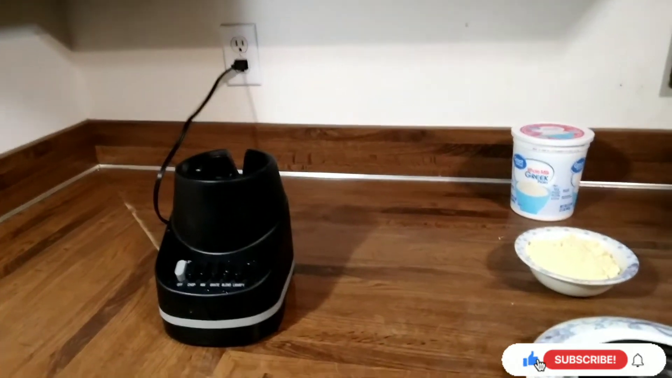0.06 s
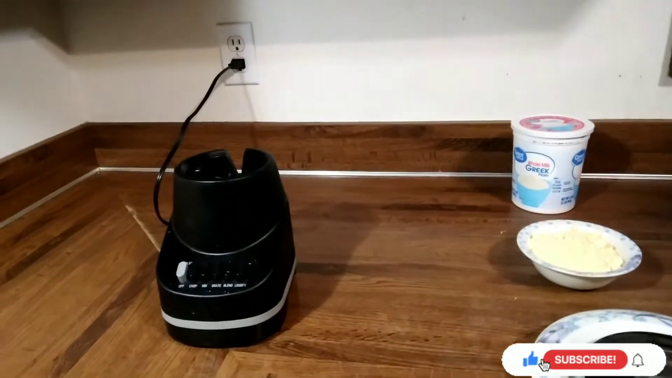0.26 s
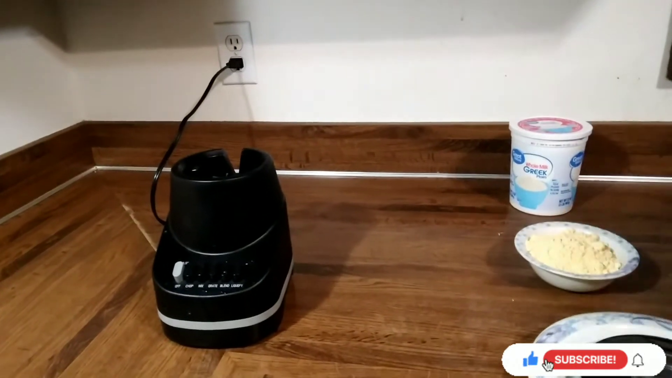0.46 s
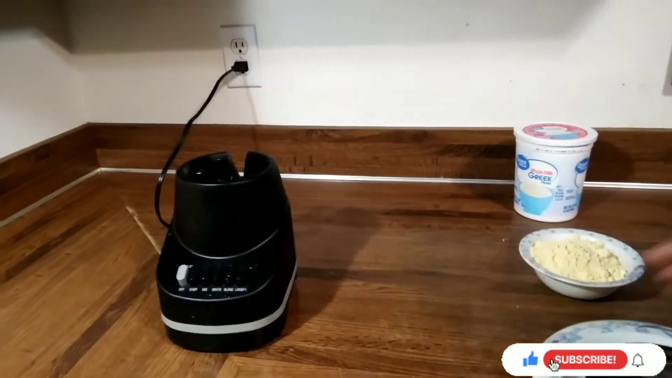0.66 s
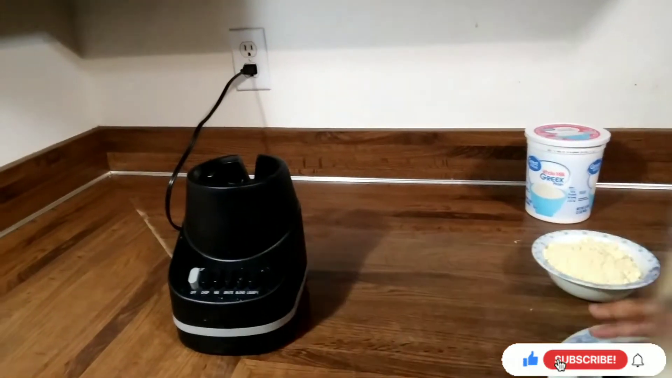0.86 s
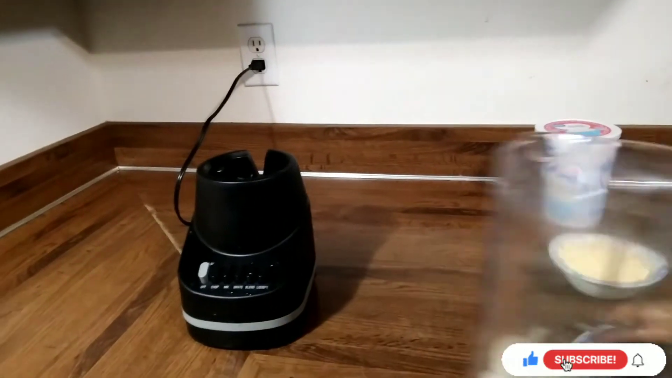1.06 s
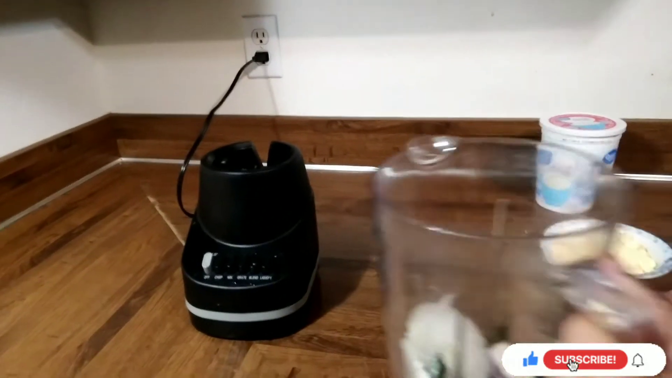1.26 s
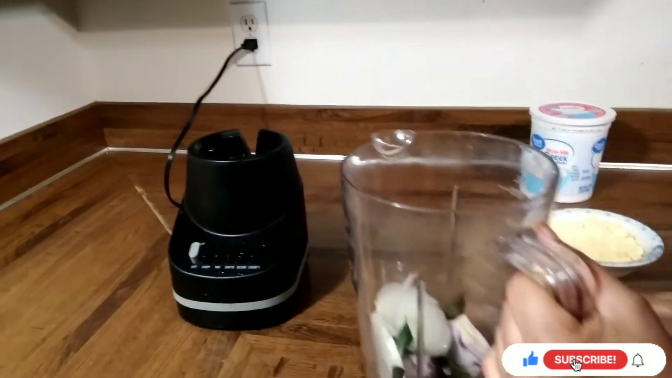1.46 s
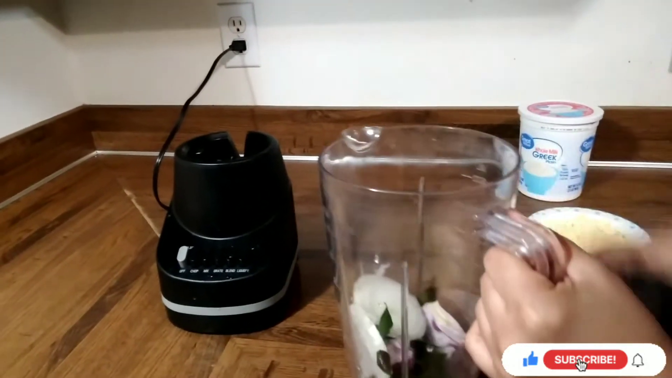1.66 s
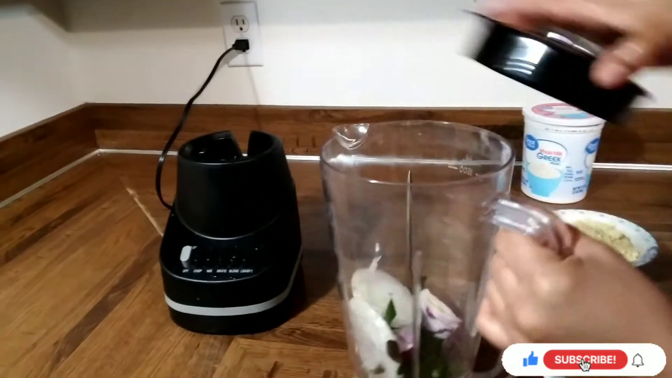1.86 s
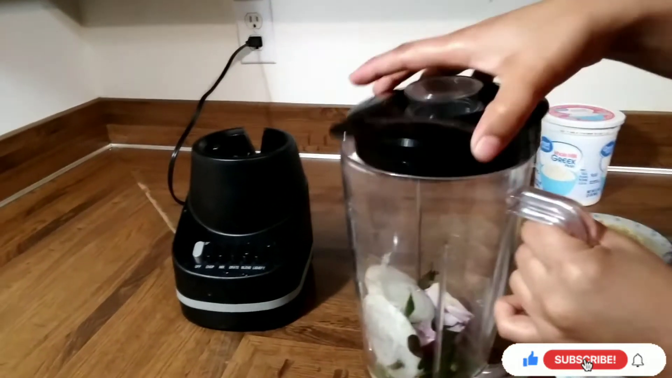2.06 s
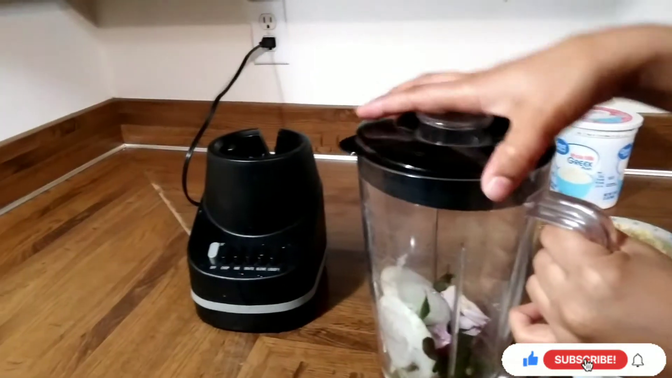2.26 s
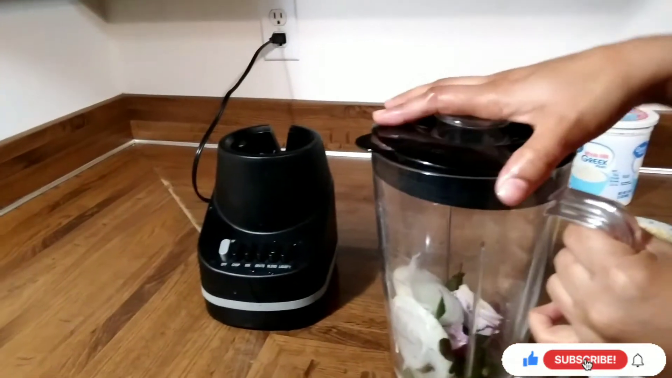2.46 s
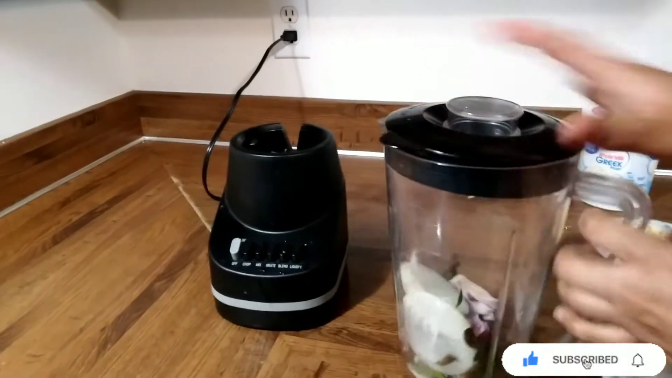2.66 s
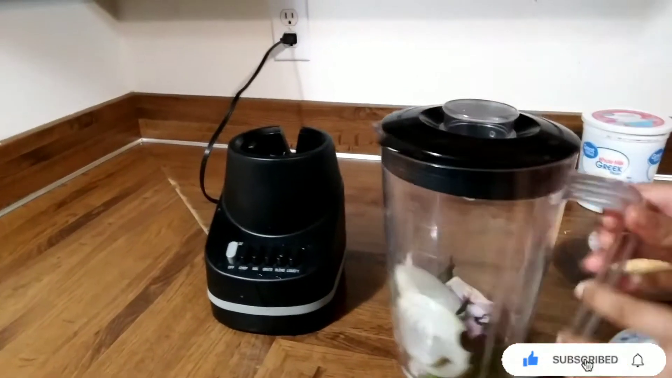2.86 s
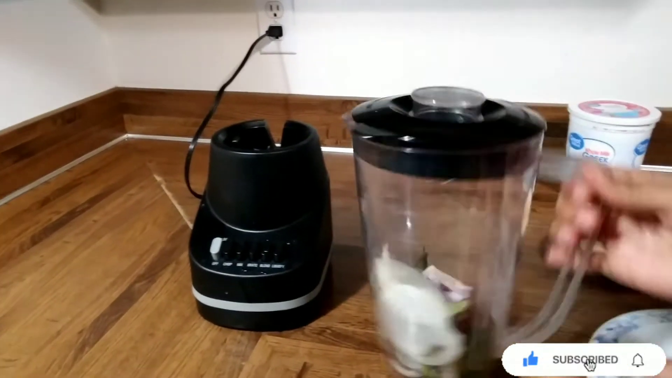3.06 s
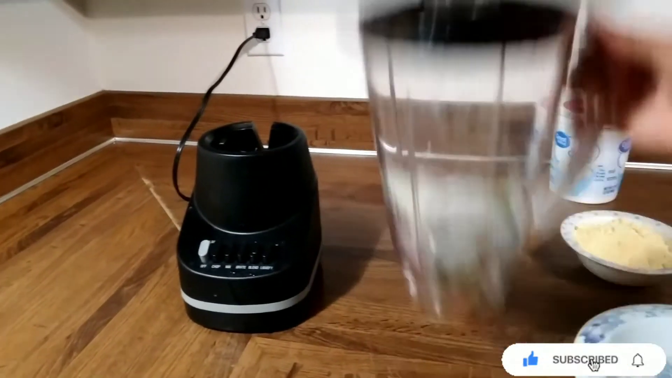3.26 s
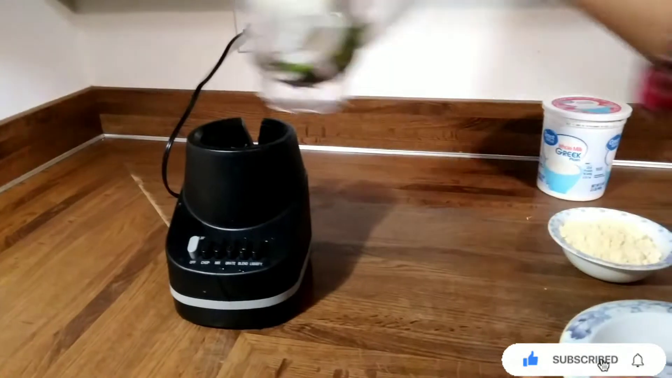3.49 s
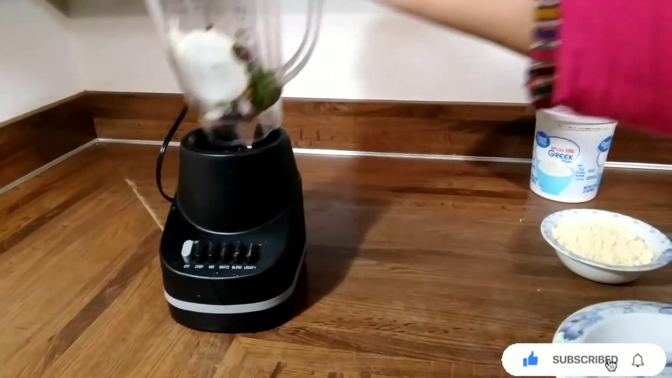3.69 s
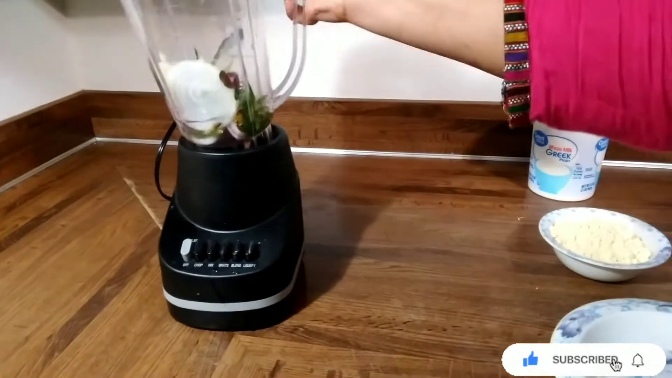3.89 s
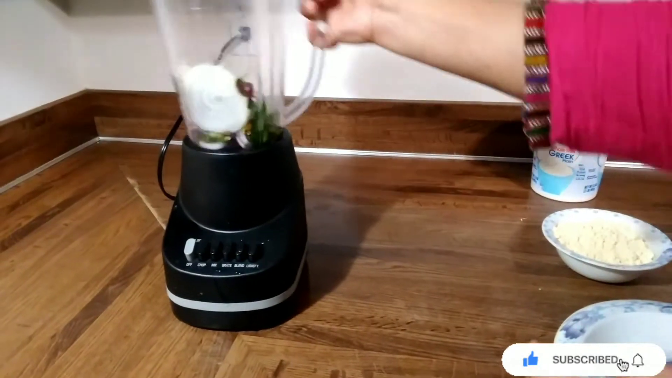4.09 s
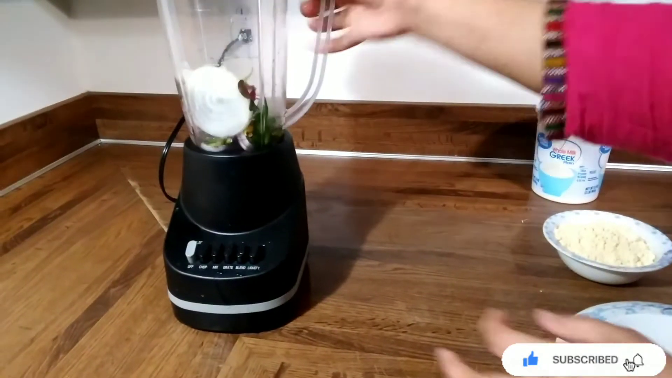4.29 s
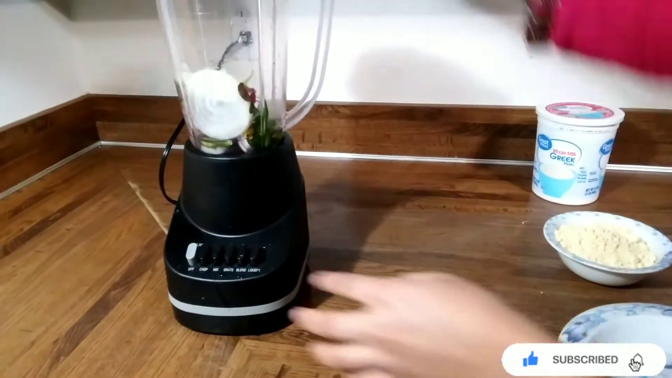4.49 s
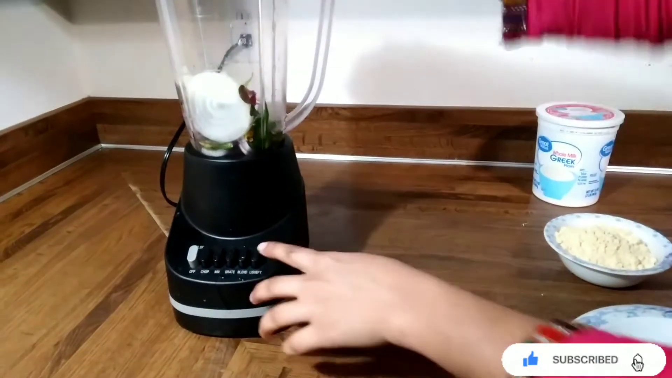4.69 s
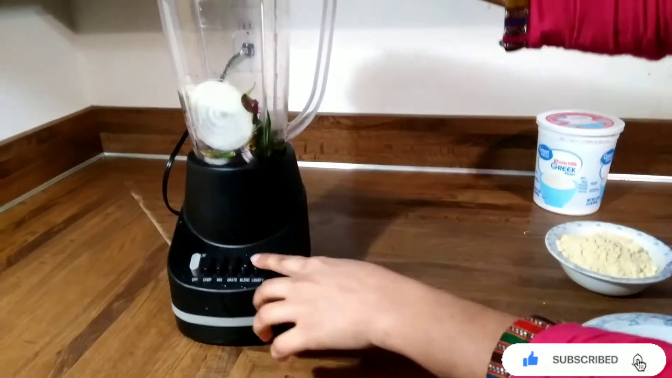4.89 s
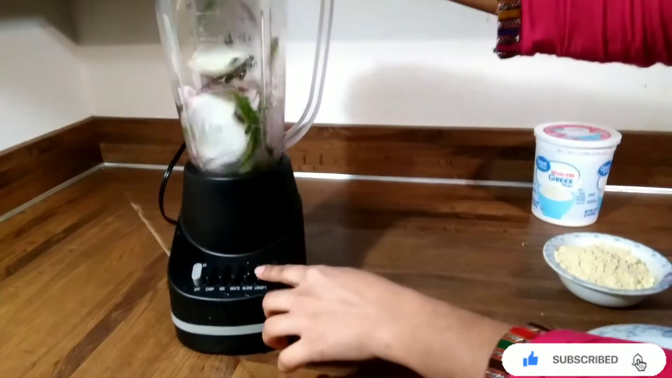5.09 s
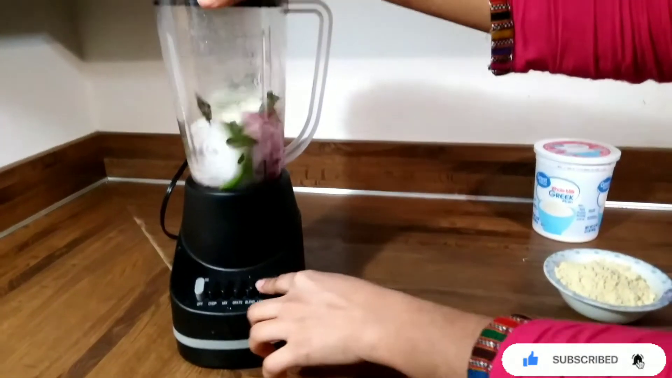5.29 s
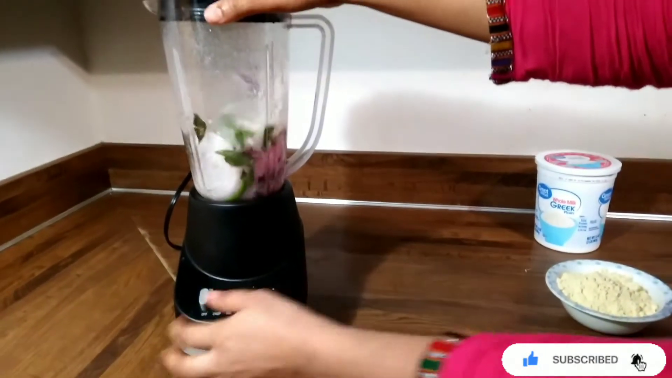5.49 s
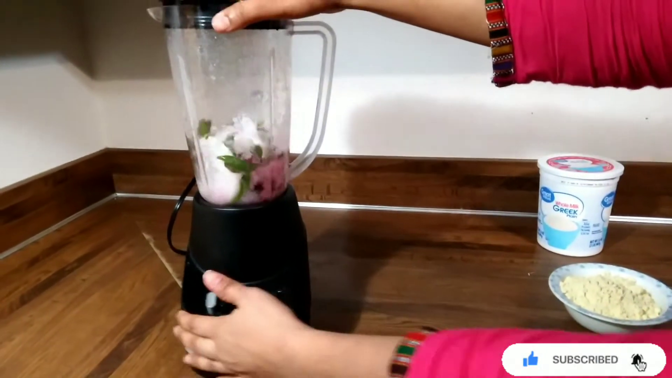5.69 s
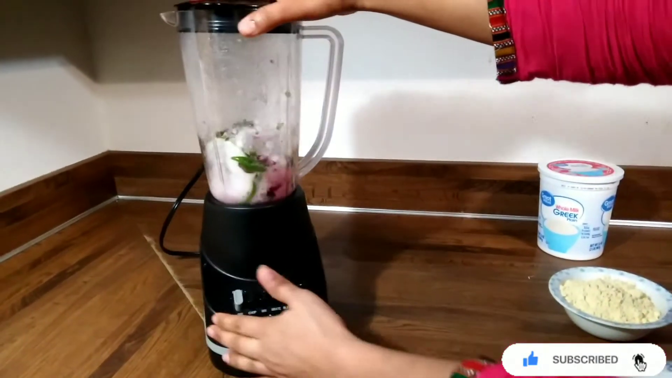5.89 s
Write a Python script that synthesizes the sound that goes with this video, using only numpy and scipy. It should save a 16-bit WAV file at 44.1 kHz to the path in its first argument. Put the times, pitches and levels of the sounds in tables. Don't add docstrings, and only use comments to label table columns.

```python
import sys
import numpy as np
from scipy import signal
from scipy.fft import rfft, irfft, next_fast_len
from scipy.io import wavfile
from scipy.ndimage import uniform_filter1d

SR = 44100
rng = np.random.default_rng(int(sys.argv[2]) if len(sys.argv) > 2 else 0)


def store_pcm(level_fs):
    pcm = np.round(np.clip(level_fs, -1, 1) * 32767).astype(np.int16)
    wavfile.write(sys.argv[1], SR, np.atleast_2d(pcm).T)


def elevation(decibels):
    levels = np.asarray(decibels, float)
    return 10 ** (levels / 20)


N = 261947
T = np.arange(N) / SR


def rms_one(x):
    return x / np.sqrt(np.mean(x ** 2) + 1e-20)


def in_time(rows):
    s, value = np.transpose(rows)
    return np.interp(T, s, value)


def at_hz(points, hz):
    point_hz, value = np.transpose(points)
    return np.interp(np.log(hz + 1), np.log(point_hz), value)


def drift(rate_hz, size=N):
    knot_hz = 400
    knots = rng.standard_normal(int(size / SR * knot_hz) + knot_hz + 2)
    r = np.exp(-2 * np.pi * rate_hz / knot_hz)
    slow = signal.lfilter([1], [1, -2 * r, r * r], knots)
    slow = rms_one(slow[knot_hz:])
    return np.interp(np.arange(size) / SR * knot_hz, np.arange(len(slow)), slow)


def ring(clicks, hz, t60_s):
    r = elevation(-60 / (t60_s * SR))
    w = 2 * np.pi * hz / SR
    return signal.lfilter([0, np.sin(w)], [1, -2 * r * np.cos(w), r * r], clicks + 1e-18)


def treble(x, hz):
    return x - signal.sosfiltfilt(signal.butter(2, hz, fs=SR, output="sos"), x)


def swells(rows, t):
    s, db, rise_s, fall_s = np.transpose(rows)[..., None]
    away = np.maximum((s - t) / rise_s, (t - s) / fall_s)
    return elevation(np.max(db - 20 * away, axis=0))


# f/Hz, likeness/1
LIKENESS = [(60, 0.85), (130, 1), (270, 1), (400, .95), (570, 0.78), (1220, -0.38), (2580, -0.22),
            (5480, 0.18), (11600, -1.2)]


def noise(spectrum, patchy_db=0., rate_hz=15, size=N):
    padded = next_fast_len(size)
    hz = np.arange(padded // 2 + 1) * SR / padded
    alike = np.clip(at_hz(LIKENESS, hz), -1, 1)
    mid, side = rfft(rng.standard_normal((2, size)), padded) * elevation(at_hz(spectrum, hz))
    pair = np.sqrt(1 + alike) * mid + np.sqrt(1 - alike) * side * [[1], [-1]]
    if not patchy_db:
        return rms_one(irfft(pair, padded)[:, :size])
    octave = np.log2(hz + 1)
    out = np.zeros((2, size))
    for k in range(4, 15):
        if 2 ** (k - 1) < spectrum[-1][0]:
            share = np.clip(1 - abs(octave - k), 0, 1)
            flicker = elevation(patchy_db * drift(rate_hz, size))
            out += irfft(pair * share, padded)[:, :size] * flicker
    return rms_one(out)


def kitchen(x):
    t60_s, level_db = 0.27, -6
    t = T[:SR // 2]
    tail = rng.standard_normal((2, len(t))) * elevation(-60 * t / t60_s) * (t > .004)
    tail = signal.sosfilt(signal.butter(2, [520, 4800], "band", fs=SR, output="sos"), tail)
    tail = tail / np.sqrt(np.sum(tail ** 2) / 2)
    return x + elevation(level_db) * signal.fftconvolve(x, tail, axes=1)[:, :N]


# opens t/s, shuts t/s, airy top re hiss level/dB, lower edge re hiss level/dB
GATE = [(0.0, 0.073, -19, -3), (0.208, 0.234, -5, -6), (0.611, 0.638, -8, -2), (0.838, 1.215, -14, -6),
        (1.343, 1.947, -10, -1), (1.947, 2.288, -13, -2), (2.43, 3.155, -11, -1), (3.57, 3.6, 3, -8),
        (3.645, 3.715, -25, -5), (3.757, 3.965, -19, -6), (3.995, 4.197, -11, -4), (4.228, 4.305, -20, -2),
        (4.338, 4.35, -20, -2), (4.43, 4.555, -6, -3), (4.588, 4.797, -9, -7), (4.9, 5.1, -14, -5)]
# peak t/s, level/dB, rise per 20 dB t/s, fall per 20 dB t/s
RUSTLES = [(0.0, -54.5, .01, .1), (0.218, -73.5, .011, .025), (0.626, -75, .025, .02),
           (0.875, -63, .05, .3), (1.19, -62, .2, .2), (2.0, -56, .1, .7), (4.344, -78, .02, .02),
           (0.948, -46, .03, .1), (1.05, -42, .16, .11), (1.37, -53, .2, .5), (1.58, -46, .12, .12),
           (1.7, -52.5, 1.5, 2.5), (1.862, -46, .12, .1), (2.116, -40, .008, .045), (2.24, -59, .1, .05),
           (2.58, -48, .12, .45), (2.815, -46, .05, .07), (2.93, -44, .13, .09), (3.045, -40, .07, .075),
           (3.575, -82, .01, .05), (3.646, -63, .01, .11), (3.765, -46, .012, .2), (3.83, -46, .2, .04),
           (3.95, -66, .02, .03), (4.012, -55, .008, .08), (4.033, -57, .045, .06), (4.076, -54, .007, .12),
           (4.272, -73, .04, .04), (4.49, -68, .12, .3), (4.62, -50, .03, .04), (4.664, -50, .012, .08),
           (4.905, -67, .01, .12)]
RUSTLE_TOP_DB = -40


def suppressor():
    level, top, edge, gate = np.zeros((4, N))
    for opens_s, shuts_s, airy_db, edge_db in GATE:
        inside = (T >= opens_s) & (T < shuts_s)
        passed = [row for row in RUSTLES if opens_s - .03 < row[0] < shuts_s]
        level[inside] = np.minimum(swells(passed, T[inside]), elevation(RUSTLE_TOP_DB))
        top[inside] = level[inside] * elevation(airy_db + 11)
        edge[inside] = level[inside] * elevation(edge_db)
        gate[inside] = 1
    return uniform_filter1d([level, top, edge, gate], size=250)


# f/Hz, level/dB per Hz
HISS = [(410, -47), (700, -13), (1290, -77), (1790, -37), (2220, 2.5), (2560, -3.5), (2750, 2.5),
        (4380, -0.5), (6270, -20.5), (10500, -11.5), (12100, -34), (15700, -67.5), (22000, -120)]
# f/Hz, width/Hz, level/dB
HISS_PEAKS = [(2300, 120, -9), (2650, 150, -9), (3150, 300, -7), (1600, 80, -28)]


def hiss_and_rustle(level, top_level, edge_level):
    white = rng.standard_normal((2, N))
    hiss = noise(HISS, patchy_db=2.0, rate_hz=25)
    for hz, width_hz, db in HISS_PEAKS:
        hiss = hiss + elevation(db + 4 * drift(6)) * rms_one(ring(white, hz, 2.2 / width_hz))
    top = treble(hiss, 5500)
    edge = hiss - treble(hiss, 2750)
    middle = hiss - top - edge
    out = (elevation(1.5) * level + elevation(-83.5)) * middle
    out += (elevation(1.5) * edge_level + elevation(-84)) * edge
    return out + elevation(6) * (top_level + elevation(-79)) * top


# t/s, deep level/dB, sliding level/dB, rise or fall per 20 dB t/s
SHOVES = [(0.0, -58, -62, .15), (0.56, -46, -66, .25), (1.0, -58, -48, .14), (1.12, -45, -60, .2),
          (1.38, -42, -50, .1), (1.8, -70, -57, .3), (2.2, -56, -58, .4), (2.6, -60, -54, .8),
          (2.96, -50, -45, .2), (3.2, -62, -60, .3), (3.88, -45, -42, .12), (3.97, -60, -58, .1),
          (4.22, -41, -44, .2), (4.38, -50, -60, .2), (4.66, -45, -58, .25), (4.85, -49, -52, .14)]
# f/Hz, level/dB per Hz
SLIDING = [(41, -16), (70, 0), (107, -8.5), (183, -11.5), (228, -6), (310, -15.5), (945, -23), (1500, -39),
           (1950, -55), (3300, -120)]
STILL_DEEP_DB, STILL_SLIDING_DB, SLIDING_TOP_DB = -63, -68, -50


def shoves():
    deep_level = elevation(STILL_DEEP_DB) + swells([(s, db, span_s, span_s) for s, db, _, span_s in SHOVES], T)
    sliding_level = elevation(STILL_SLIDING_DB) + swells([(s, db, span_s, span_s) for s, _, db, span_s in SHOVES], T)
    deep_spectrum = [(12, -28.5), (25, 13), (60, 4), (110, -16.5), (300, -85.5)]      # Hz, dB per Hz
    deep = noise(deep_spectrum, patchy_db=2.0, rate_hz=6)
    sliding = noise(SLIDING, patchy_db=4.5, rate_hz=19)
    return deep_level * deep + np.minimum(sliding_level, elevation(SLIDING_TOP_DB)) * sliding


# f/Hz, level/dB, t60 factor/1
BODY = [(76.5, 4, 1.2), (110.3, 2, 1.44), (150, -11.5, 1.6), (210, 2, 1.3), (288, -2, 0.65),
        (339.9, 3, 1.03), (422.8, -0.5, 0.94), (480, -1, 0.85), (600, -3.5, 0.7), (754.6, -4, 0.55),
        (888, -7, .4), (1140, -14, .5)]
# f/Hz, level/dB per Hz
CRACK = [(290, -28), (500, -8), (716, -18.5), (1110, -8.5), (1920, -13.5), (2540, -5.5), (6540, -27),
         (10200, -35), (12100, -41), (15700, -50), (22000, -120)]
# t/s, peak level/dB, favoured f/Hz, crack re peak level/dB
JAR_KNOCKS = [(0.004, -52, 320, -25), (0.425, -60, 500, -25), (0.613, -50, 250, -29),
              (0.872, -44, 331, -28), (0.937, -28, 330, -21), (0.997, -33, 400, -19), (1.069, -40, 334, -7),
              (1.148, -40, 420, -25), (1.207, -37, 330, -26), (1.347, -19.5, 346, -26),
              (1.35, -25, 76, -40), (1.377, -23, 400, -26), (1.378, -27, 100, -40), (1.499, -20, 420, -10),
              (1.508, -23, 200, -37), (1.577, -35, 355, -14)]
# t/s, peak level/dB, favoured f/Hz, crack re peak level/dB
LID_KNOCKS = [(1.947, -23.5, 418, 8.5), (2.031, -30, 380, -19), (2.111, -28, 221, -1),
              (2.238, -38, 105, -15), (2.359, -34, 200, -36), (2.431, -40, 108, -28),
              (2.554, -30, 250, -17), (2.601, -38, 208, -6), (2.767, -43, 150, -37), (2.85, -23, 250, -33),
              (2.949, -24, 212, -27), (2.972, -23, 150, -28), (2.987, -20, 205, -43), (3.03, -33, 210, -30),
              (3.07, -36, 220, -30)]
# t/s, peak level/dB, favoured f/Hz, crack re peak level/dB
BASE_KNOCKS = [(3.758, -22, 330, -22), (3.766, -20, 110, -35), (3.796, -22, 112, -30),
               (3.812, -19, 120, -28), (3.829, -12.5, 111, -38), (3.899, -30, 113, -28),
               (3.996, -36, 200, -25), (4.009, -27, 110, -27), (4.032, -18, 131, -17),
               (4.043, -15, 80, -49), (4.075, -9, 98, -26), (4.174, -25, 100, -34), (4.23, -23, 110, -42),
               (4.243, -26, 210, -38), (4.275, -27, 100, -39), (4.338, -36.5, 105, -46),
               (4.589, -22, 300, -45), (4.617, -22, 120, -25), (4.648, -20, 130, -32),
               (4.697, -26.5, 112, -28), (4.777, -38, 109, -25), (4.901, -38, 100, -24),
               (4.9665, -18.5, 337, -4), (4.98, -17, 210, -24)]
JAR_RING_S, LID_RING_S, BASE_RING_S = .12, .11, .15
MIDDLING_DB, DAMPING_PER_DB = -25, .17
SPREAD_DB = 2


def knocks():
    body, crack = np.zeros((2, N)), np.zeros(N)
    blows = [(*row, JAR_RING_S) for row in JAR_KNOCKS]
    blows += [(*row, LID_RING_S) for row in LID_KNOCKS]
    blows += [(*row, BASE_RING_S) for row in BASE_KNOCKS]
    luck = rng.standard_normal((len(blows), len(BODY), 2))
    hz, mode_db, lasting = np.transpose(BODY)
    for (s, db, pitch_hz, crack_db, ring_s), chance in zip(blows, luck):
        t60_s = ring_s * elevation(DAMPING_PER_DB * (MIDDLING_DB - db))
        i = round(s * SR)
        t = T[:round(1.5 * t60_s * SR)]
        off_pitch_db = np.minimum(13 * abs(np.log2(hz / pitch_hz)), 19)
        level = elevation(db + mode_db - 6 - off_pitch_db + SPREAD_DB * chance[:, 0])
        level = level * np.sign(chance[:, 1])
        tuned_hz = hz * (1 + 0.035 * chance[:, 1])
        modes = np.sin(2 * np.pi * np.outer(tuned_hz, t)) * elevation(-60 * np.outer(1 / (lasting * t60_s), t))
        soft = 1 - np.exp(-t / 0.0013)
        right_gain = elevation(0.94 + 3.6 * chance[::-1, 0] * hz / 1000)
        body[0, i:i + len(t)] += soft * (level @ modes)
        body[1, i:i + len(t)] += soft * (level * right_gain @ modes)
        decay = 1.0 * elevation(-60 * t / 0.012) + 0.75 * elevation(-60 * t / .05) + 0.06 * elevation(-60 * t / 0.15)
        crack[i:i + len(t)] += elevation(db + crack_db - 1.5) * decay
    return body + crack * noise(CRACK)


# t/s, peak level/dB, f/Hz, t60 t/s
TICKS = [(0.2151, -62, 3540, .05), (0.421, -57, 3500, .04), (0.538, -58, 4000, .04),
         (0.615, -63, 3200, .07), (0.94, -42, 900, .1), (0.943, -41, 1200, .08), (0.945, -46, 1700, .7),
         (0.9215, -44, 3270, .05), (0.9444, -35, 3190, .07), (1.03, -40, 3100, .25), (1.349, -41, 1200, .3),
         (1.349, -33, 580, .2), (1.3789, -38, 2730, .08), (1.4667, -40, 2650, .06),
         (1.4987, -30, 2630, .08), (1.499, -28, 560, .1), (1.522, -37, 2700, .07), (1.582, -36, 2300, .09),
         (1.585, -38, 2700, .09), (1.84, -41, 2700, .35), (1.949, -33, 8500, .1), (1.948, -30, 6000, .08),
         (2.031, -40, 2500, .06), (2.1108, -27, 4600, .07), (2.111, -32, 6200, .06),
         (2.1112, -33, 9500, .07), (2.237, -40, 3800, .1), (2.5238, -46, 2990, .06),
         (2.5458, -41, 2350, .08), (2.7892, -42, 2600, .1), (2.9, -40, 3020, .1), (2.9309, -38, 2510, .1),
         (2.85, -44, 1100, .05), (2.946, -42, 1200, .08), (2.9738, -33, 2900, .05), (2.974, -42, 950, .05),
         (2.359, -47, 650, .06), (2.432, -50, 750, .1), (2.546, -45, 700, .15), (2.975, -38, 650, .12),
         (2.112, -36, 550, .15), (1.5, -36, 800, .2), (1.862, -40, 2350, .15), (1.65, -45, 2350, .4),
         (3.045, -42, 5500, .1), (3.0152, -40, 4600, .1), (3.0302, -37, 2800, .2),
         (3.5707, -63, 6390, .05), (3.647, -44, 3150, .14), (3.76, -48, 6500, .2),
              (3.7647, -34, 3550, .08), (3.765, -33, 760, .15), (3.8281, -34, 3500, .07),
              (3.8285, -38, 2480, .04), (3.9, -50, 2200, .05), (3.9453, -47, 3430, .07),
              (3.9455, -58, 8500, .06), (3.9962, -50, 3200, .04), (4.0097, -43, 3200, .07),
              (4.0321, -37, 1500, .05), (4.0323, -40, 4000, .05), (4.0745, -29, 2150, .07),
              (4.074, -27, 900, .09), (3.76, -36, 1150, .2), (4.011, -38, 720, .06), (4.171, -34, 800, .06),
              (4.228, -42, 600, .05), (3.812, -34, 750, .06), (3.898, -44, 750, .07),
              (4.0322, -28, 850, .06), (4.617, -34, 750, .05), (4.648, -34, 750, .05),
              (4.901, -52, 1000, .05), (4.985, -22, 700, .15), (4.2426, -57, 1500, .05),
              (4.2656, -57, 2800, .08), (4.5938, -46, 1300, .05), (4.6178, -38, 3300, .07),
              (4.649, -41, 1300, .04), (4.6622, -38, 3500, .07), (4.72, -54, 3900, .4),
              (4.9076, -52, 3100, .08), (4.967, -22, 2600, .06), (4.993, -36, 9000, .06)]
TICK_RING_CYCLES = 9.0


def ticks():
    out = np.zeros((2, N))
    t = T[:SR // 6]
    rows = TICKS
    puffs = rng.standard_normal((len(rows), 2, len(t)))
    for (s, db, hz, t60_s), puff in zip(rows, puffs):
        ring_s = TICK_RING_CYCLES / hz
        tuned = rms_one(ring(ring(puff, hz, ring_s), hz, ring_s))
        envelope = elevation(db - 4.0 - 60 * t / t60_s) * (1 - np.exp(-t / .0006))
        out[:, round(s * SR):][:, :len(t)] += envelope * tuned
    return out


# t/s, peak level/dB
LID_HITS = [
    (1.9471, -3),
    (2.1115, -23),
    (2.2369, -30),
]
# f/Hz, level/dB, t60 t/s
LID = [(420, -14, .06), (1020, -15, .06), (1300, -19, .04), (1600, -12, .045), (1850, -18, .04),
       (2300, -9, .04), (2450, -7, .03), (2650, -9, .03), (2950, -12, .03), (3500, -13, .025),
       (4000, -11, .02), (4960, -18, .02), (5640, -22, .02)]


def lid():
    out = np.zeros((2, N))
    hit_s, hit_db = np.transpose(LID_HITS)
    at = np.round(hit_s * SR).astype(int)
    for hz, mode_db, t60_s in LID:
        clicks = np.zeros((2, N))
        strength = rng.normal(1, 0.13, (2, len(at))) * rng.choice([-1, 1])
        clicks[:, at] = elevation(hit_db + mode_db - 8) * strength
        out += ring(clicks, hz, t60_s)
    return out


# t/s, peak level/dB, from f/Hz, to f/Hz, t60 t/s
POPS = [
    (1.9475, -21, 400, 450, .13),
    (2.0315, -20, 380, 355, .1),
    (2.7665, -37, 300, 500, .09),
    (2.8505, -21, 260, 560, .055),
    (3.763, -16, 350, 400, .06),
    (4.984, -8, 200, 215, .08),
]
POP_GLIDE_S = .012


def pops():
    out = np.zeros(N)
    t = T[:SR // 5]
    for s, db, from_hz, to_hz, t60_s in POPS:
        hz = to_hz + (from_hz - to_hz) * np.exp(-t / POP_GLIDE_S)
        envelope = elevation(db - 60 * t / t60_s) * (1 - np.exp(-t / .0015))
        out[round(s * SR):][:len(t)] += envelope * np.sin(2 * np.pi * np.cumsum(hz) / SR)
    return out


def appliance():
    whine_hz, whine_db, on_s = 1170, -83, 3.55
    level = elevation(whine_db + 3.5 * drift(5)) * (T > on_s)
    return level * np.sin(2 * np.pi * whine_hz * T + .8 * drift(15))


# order/1, level/dB
SHAFT_ORDERS = [(1.25, -36.5), (2.5, -35.5), (3.5, -45), (4, -29), (5, -29), (6, -33), (12, -34.5),
                (13, -39.5)]
# f/Hz, level/dB
SHAFT_ANSWER = [(70, -42), (110, -31), (160, -30), (200, -22), (220, -10), (243, -20), (250, -15.5),
                (256, -27), (270, -21)]
# f/Hz, level/dB
SECOND_ANSWER = [(140, -31), (400, -40), (440, -27), (466, -35), (494, -27), (503, -40), (525, -26),
                 (545, -35)]
# f/Hz, level/dB
THIRD_ANSWER = [(200, -35), (600, -44), (700, -25), (725, -38), (742, -24), (753, -40), (780, -27),
                (815, -44)]
FAN_DB, FAN_DB_PER_TURN = -14, .28


def shaft_and_fan(turns_hz, angle):
    size = len(angle)
    tones = elevation(at_hz(SHAFT_ANSWER, turns_hz) + 2.5) * np.sin(angle)
    tones = tones + elevation(at_hz(SECOND_ANSWER, 2 * turns_hz) + 5.5) * np.sin(2 * angle)
    tones = tones + elevation(at_hz(THIRD_ANSWER, 3 * turns_hz) + 6.5) * np.sin(3 * angle)
    for k, db in SHAFT_ORDERS:
        phase = k * rng.uniform(0, .4, (2, 1))
        tones = tones + elevation(db + 4 * drift(5, size)) * np.sin(k * angle + phase)
    fan_db = FAN_DB + FAN_DB_PER_TURN * (turns_hz - turns_hz[-1])
    fan_level = elevation(fan_db + 0.3 + 1.0 * drift(8, size))
    return tones + fan_level * np.sin(10 * angle + [[0], [-.3]])


# peak t/s, level/dB, rise per 20 dB t/s, fall per 20 dB t/s
SURGES = [
    (5.03, -11, .06, .08),
    (5.38, -16, .06, .1),
    (5.64, -26, .1, .1),
    (5.9, -22, .04, .08),
]
BUZZ_DB = -28


def mains_buzz(t):
    size = len(t)
    level = (elevation(BUZZ_DB) + swells(SURGES, t)) * elevation(3.0 * drift(4.9, size))
    return level * np.sin(2 * np.pi * 118 * T[:size] + 1.0 * drift(10, size))


# f/Hz, level/dB per Hz
ROAR = [(18, -62), (30, -28.5), (113, -5), (169, -20), (229, -5), (302, -15.5), (334, -7), (524, -17.5),
        (565, -14.5), (691, -12.5), (1350, -12.5), (1840, -17), (2090, -10), (2680, -7.5), (5830, -21.5),
        (10400, -21), (12100, -36), (13000, -46), (15700, -53), (16500, -120), (22000, -120)]
# f/Hz, width/Hz, level/dB
HOUSING = [(317, 40, -11.5), (507, 50, -7), (690, 70, -6), (949, 50, -11), (1181, 67, -9), (2150, 200, 3),
           (2350, 200, 3), (2600, 300, -5), (3250, 300, 6), (3600, 250, 3), (4150, 330, 3)]
# t/s, level/dB
LOAD = [(4.966, -25), (4.99, -25), (5.0, -22), (5.05, -23), (5.062, -18), (5.095, -16), (5.11, -13),
        (5.21, -15), (5.3, -13.5), (5.39, -14), (5.46, -17.5), (5.53, -15), (5.7, -14.5), (5.83, -15.5),
        (5.91, -14.5)]


def chopping_roar(turns_hz, angle, load_db):
    size = len(angle)
    roar = noise(ROAR, patchy_db=1.4, rate_hz=16, size=size)
    hits_per_s = 1500
    struck = (rng.random(size) < hits_per_s / SR) * elevation(2.3 * np.minimum(rng.exponential(1, size), 3))
    rattle = 0
    for hz, width_hz, db in HOUSING:
        ports = 1 if hz < 800 else 2
        clicks = struck * rng.standard_normal((ports, size))
        rattle = rattle + elevation(db) * ring(clicks, hz, 4.0 / width_hz)
    slow = 1 - turns_hz / turns_hz[-1]
    dull = roar - treble(roar, 1100)
    brushes = treble(roar, 8500)
    roar = roar + dull * 1.0 * slow ** 2 + brushes * 1.2 * slow ** 2
    for _ in range(5):
        roar = roar - treble(roar, 13000) * np.minimum(6.0 * slow ** 2, 1)
    roar = treble(roar, 45)
    beat = 1 + 0.073 * np.sin(angle)
    return elevation(load_db + 1.1) * (roar * beat + 0.38 * rms_one(rattle))


# t/s, shaft f/Hz
SPEED = [(4.97, 60), (5.046, 131), (5.094, 186), (5.14, 212), (5.22, 233), (5.3, 245), (5.445, 254.6),
         (5.72, 268.3), (5.94, 276.5)]
SWITCH_ON_S = 4.964


def motor():
    first = round(SWITCH_ON_S * SR)
    size = N - first
    turns_hz = in_time(SPEED)[first:]
    angle = 2 * np.pi * np.cumsum(turns_hz * (1 + .0015 * drift(12, size))) / SR
    tones = shaft_and_fan(turns_hz, angle) + mains_buzz(T[first:])
    roar = chopping_roar(turns_hz, angle, in_time(LOAD)[first:])
    out = np.zeros((2, 2, N))
    out[..., first:] = np.array([tones, roar]) * (1 - np.exp(-T[:size] / 0.0026))
    return out


def scene():
    *hiss_levels, gate = suppressor()
    blows = kitchen(lid() + knocks() + pops())
    blows = signal.sosfilt(signal.butter(6, 11500, fs=SR, output="sos"), blows)
    handling = blows + hiss_and_rustle(*hiss_levels) + shoves()
    dimming = (1 - elevation(-13)) * (1 - gate)
    handling = handling - treble(handling, 790) * dimming
    tones, roar = motor()
    return handling + ticks() * (1 - dimming) + appliance() + tones + kitchen(roar)


def band_limit(x):
    return signal.sosfilt(signal.butter(12, 15900, fs=SR, output="sos"), x)


# f/Hz, left minus right level/dB
PORTS = [(60, -1), (110, -2), (190, -0.5), (350, 1), (620, -5), (1120, 1.5), (2010, 1), (3610, 9.5),
         (6470, -4.5), (11600, -59.5)]
# f/Hz, phase/rad
LEFT_LAG = [(20, 0), (340, -.05), (520, -.5), (950, -1.1), (1800, -1.3)]


def record(dry):
    size = next_fast_len(N + SR // 2)
    hz = np.arange(size // 2 + 1) * SR / size
    tilt_db = at_hz(PORTS, hz)
    left = np.sqrt(2 / (1 + elevation(-2 * tilt_db)))
    right = left * elevation(-tilt_db)
    responses = [left * np.exp(1j * at_hz(LEFT_LAG, hz)), right]
    ports = irfft(rfft(dry, size) * responses, size)[:, :N]
    mix = np.clip(ports, -1, 1)
    return band_limit(mix)


dry = scene()
out = record(dry)
store_pcm(out)
```